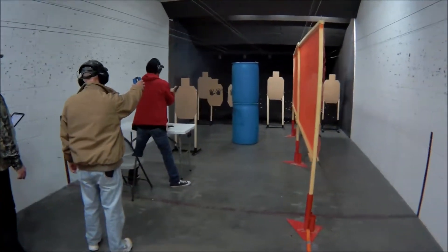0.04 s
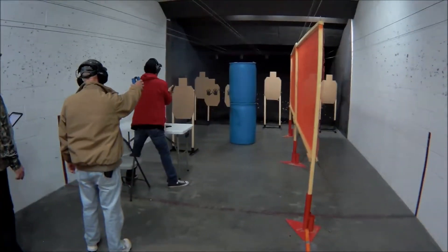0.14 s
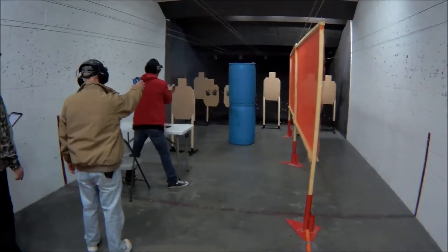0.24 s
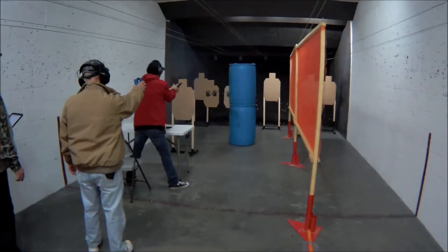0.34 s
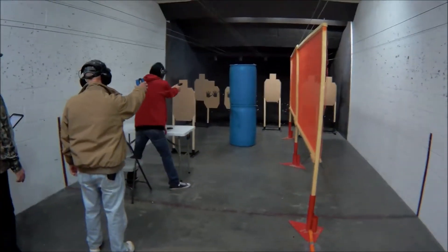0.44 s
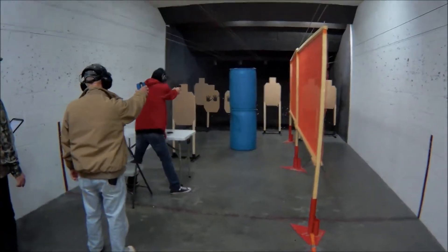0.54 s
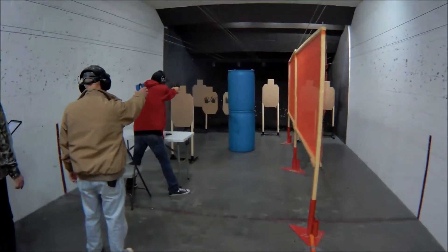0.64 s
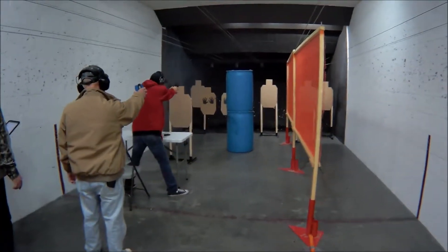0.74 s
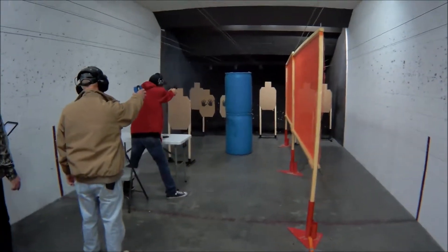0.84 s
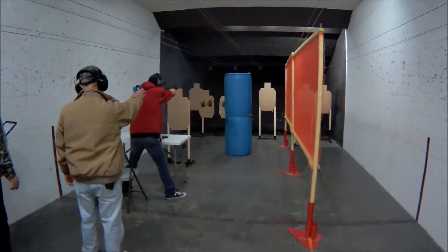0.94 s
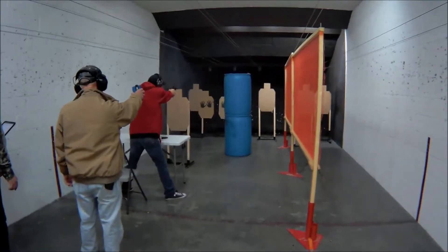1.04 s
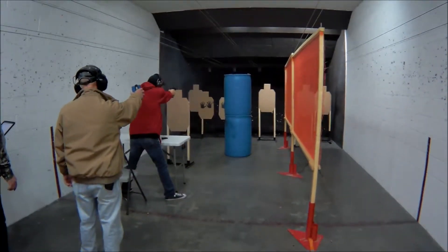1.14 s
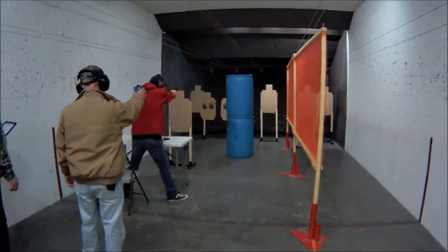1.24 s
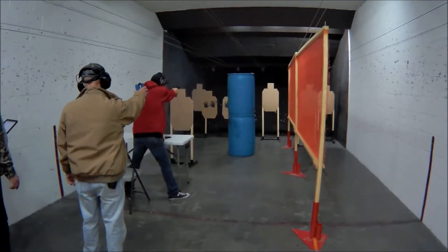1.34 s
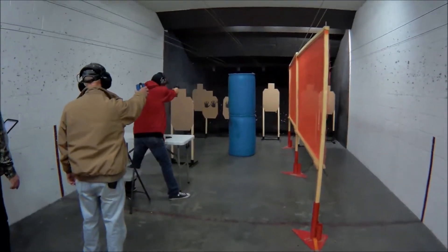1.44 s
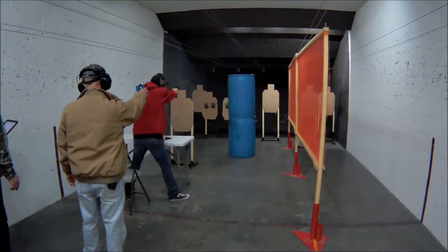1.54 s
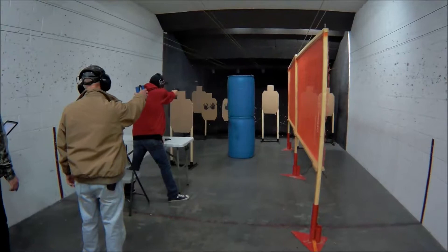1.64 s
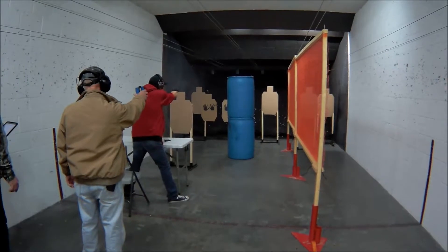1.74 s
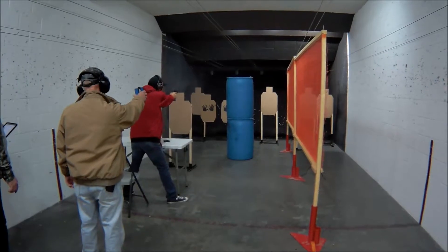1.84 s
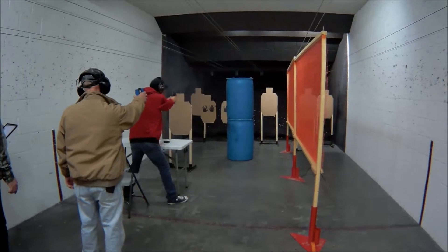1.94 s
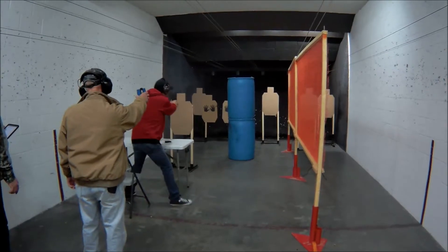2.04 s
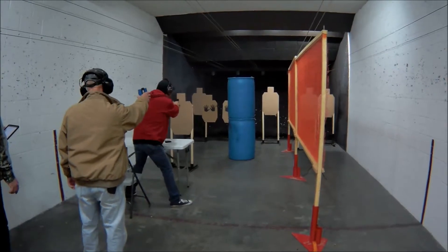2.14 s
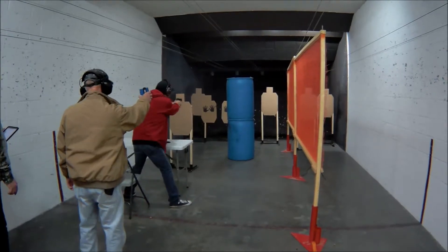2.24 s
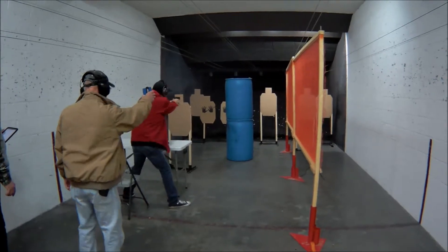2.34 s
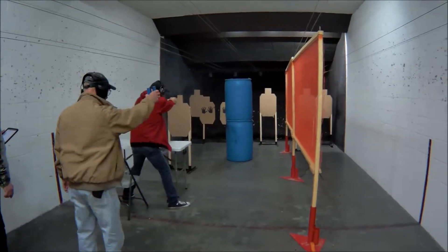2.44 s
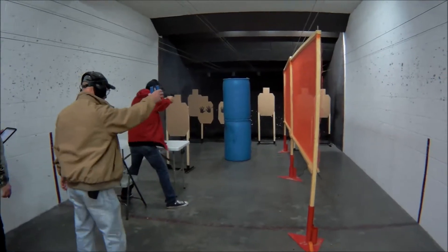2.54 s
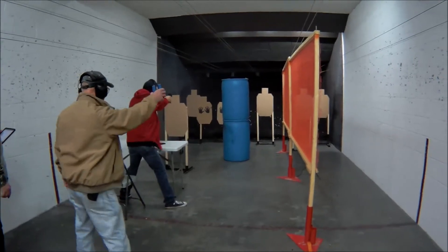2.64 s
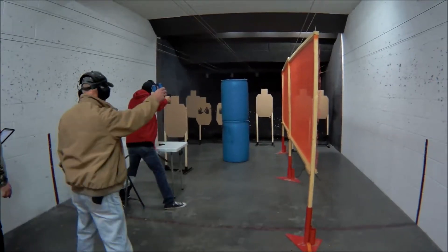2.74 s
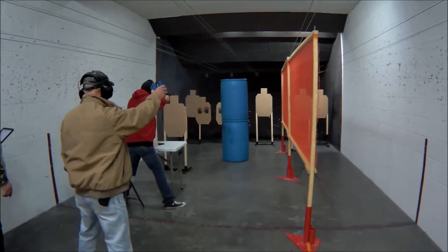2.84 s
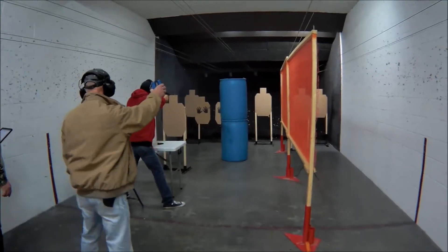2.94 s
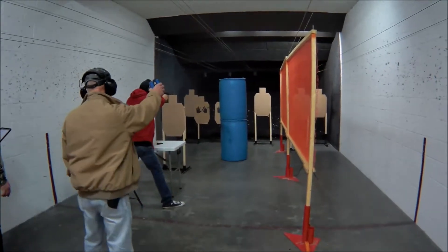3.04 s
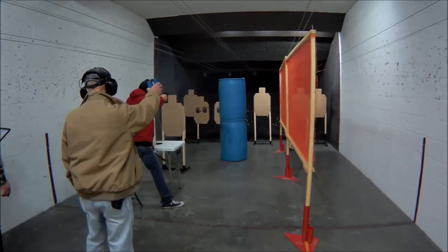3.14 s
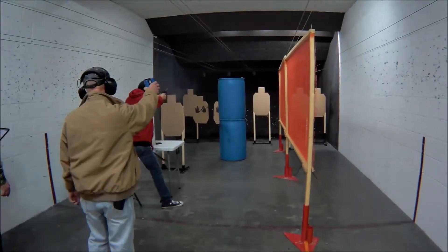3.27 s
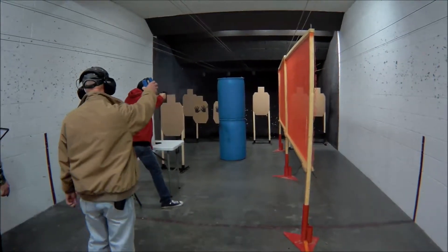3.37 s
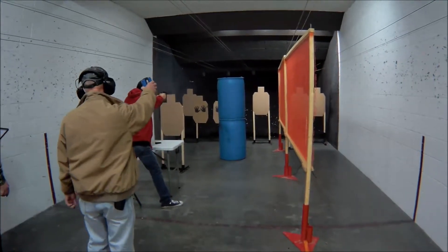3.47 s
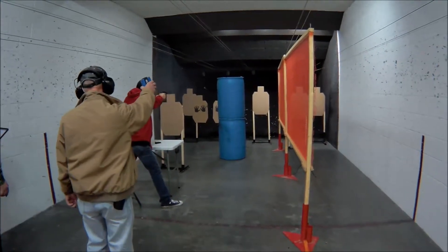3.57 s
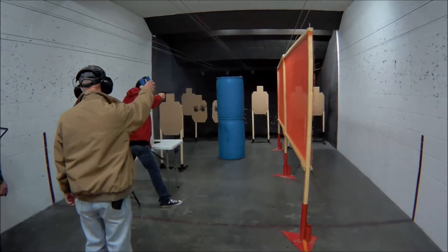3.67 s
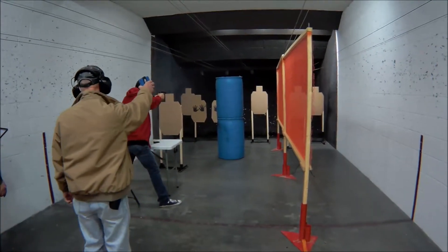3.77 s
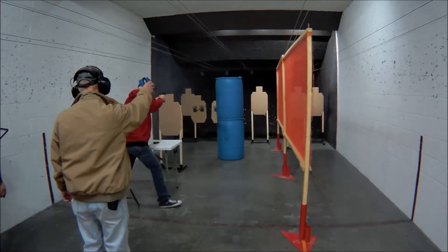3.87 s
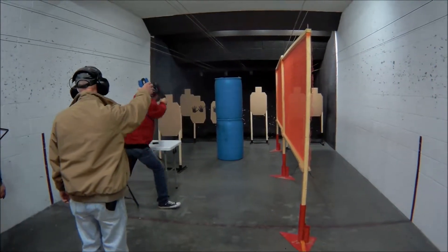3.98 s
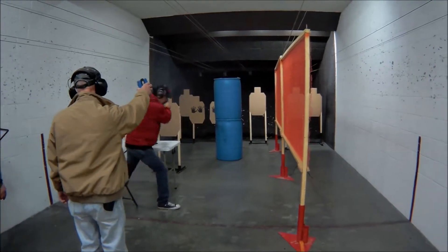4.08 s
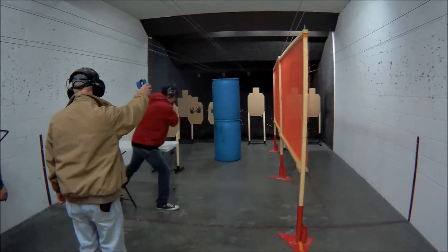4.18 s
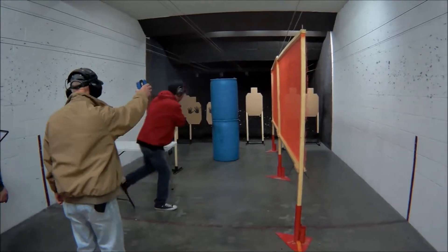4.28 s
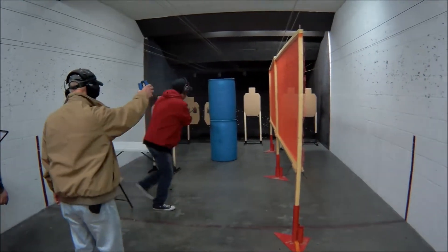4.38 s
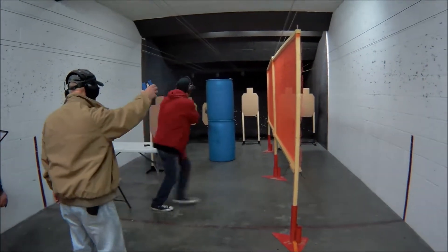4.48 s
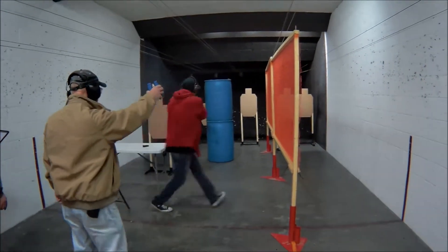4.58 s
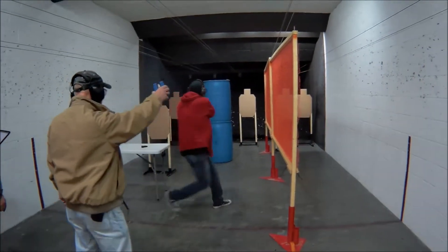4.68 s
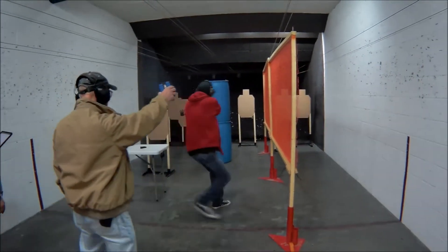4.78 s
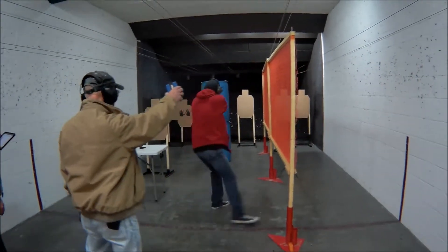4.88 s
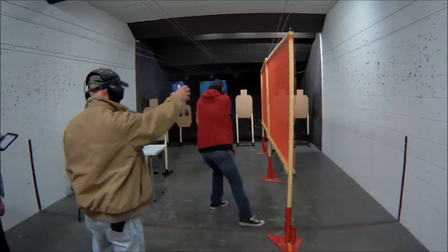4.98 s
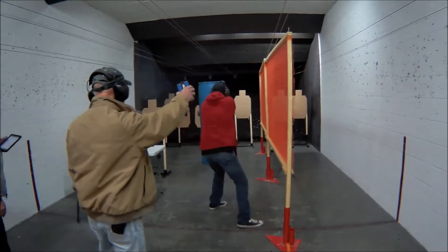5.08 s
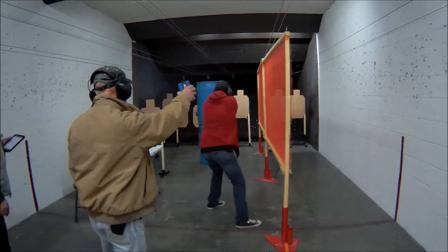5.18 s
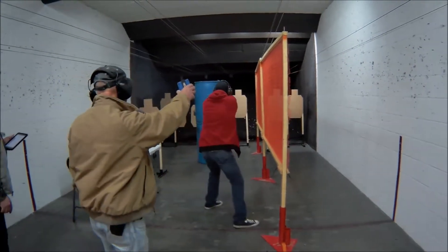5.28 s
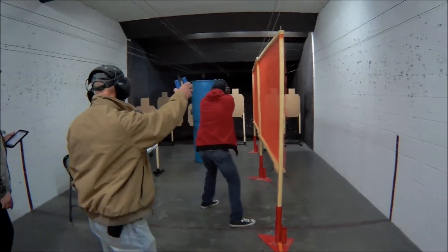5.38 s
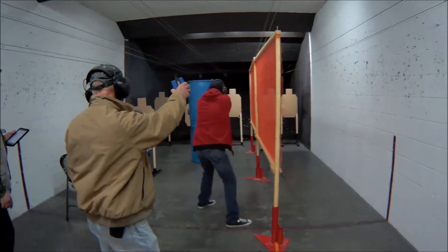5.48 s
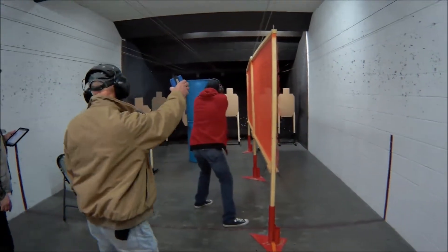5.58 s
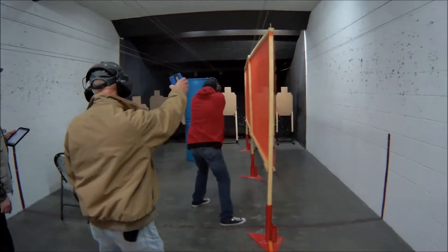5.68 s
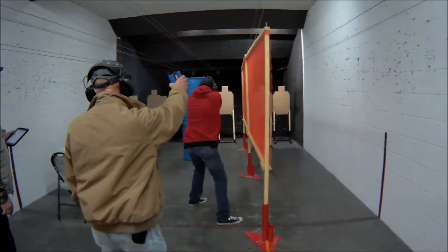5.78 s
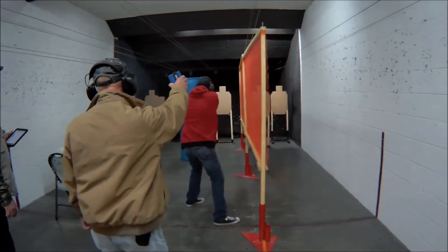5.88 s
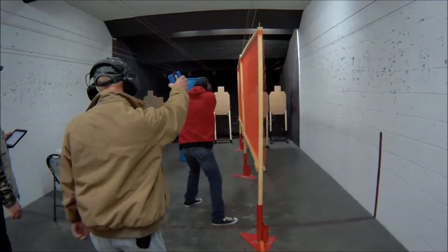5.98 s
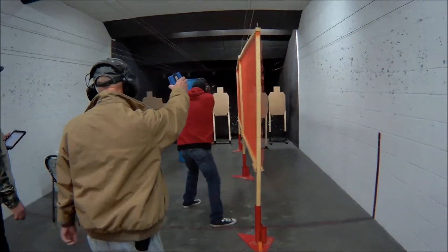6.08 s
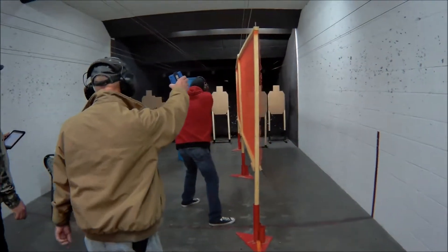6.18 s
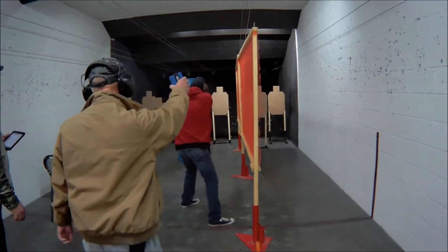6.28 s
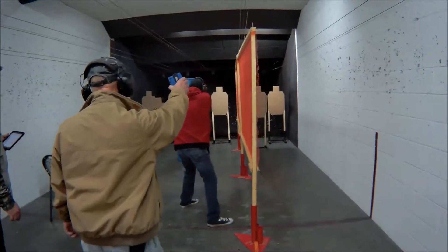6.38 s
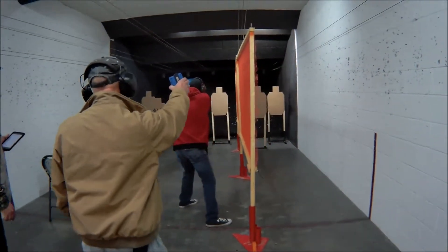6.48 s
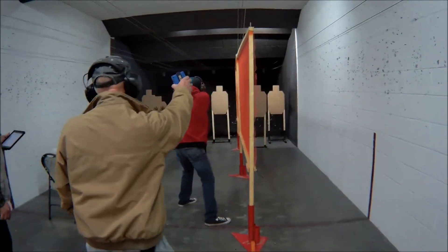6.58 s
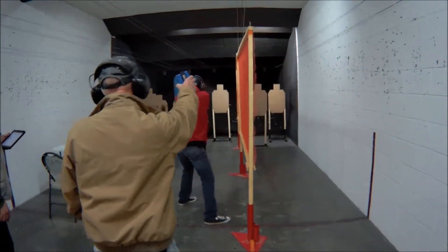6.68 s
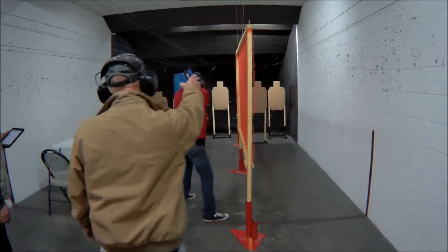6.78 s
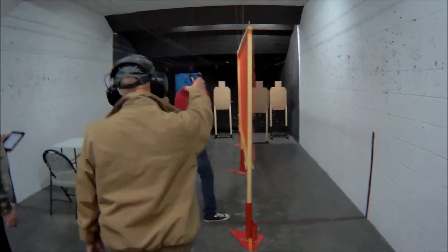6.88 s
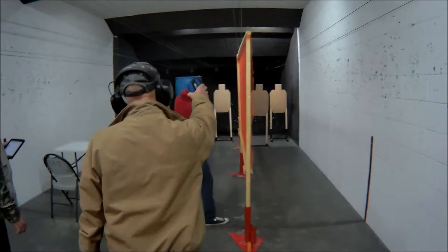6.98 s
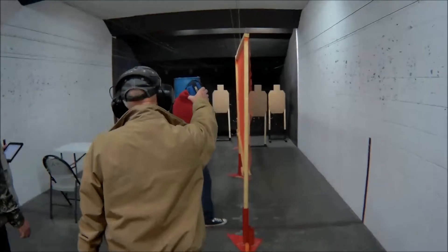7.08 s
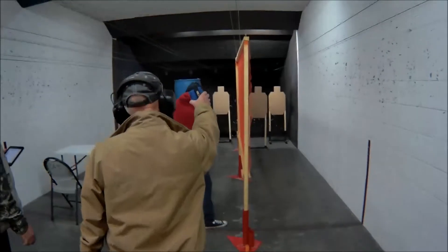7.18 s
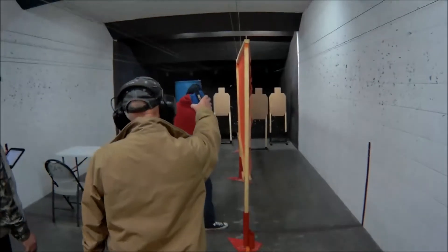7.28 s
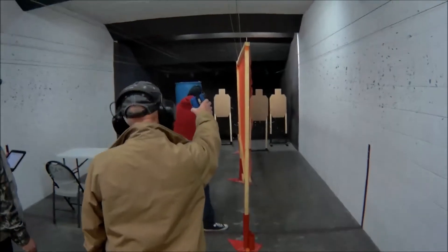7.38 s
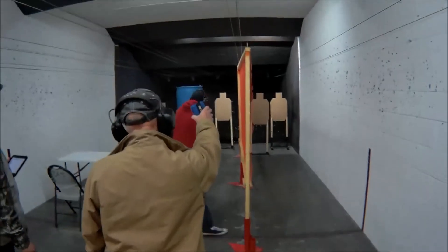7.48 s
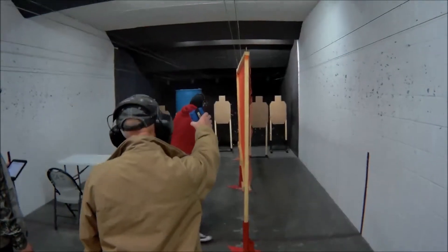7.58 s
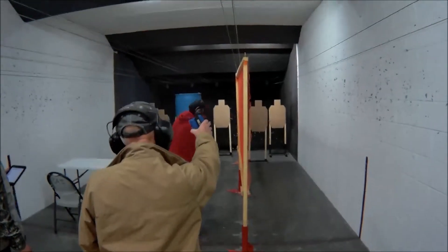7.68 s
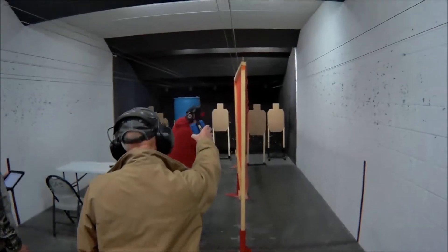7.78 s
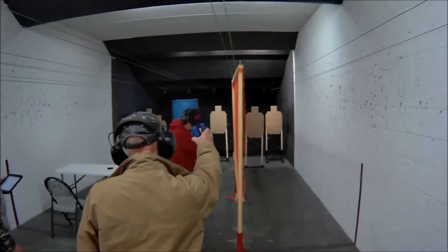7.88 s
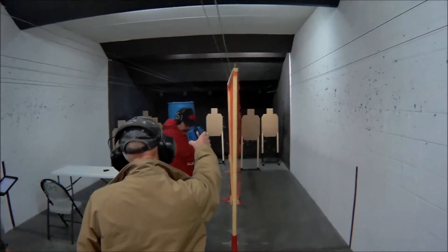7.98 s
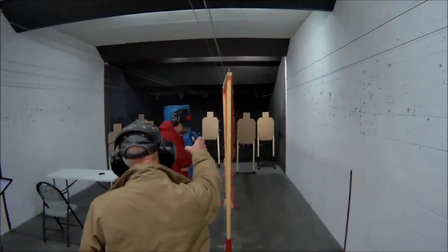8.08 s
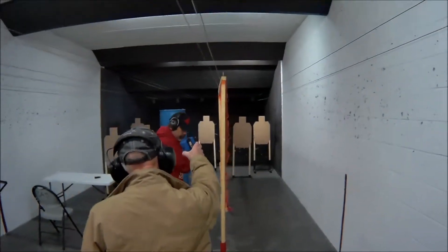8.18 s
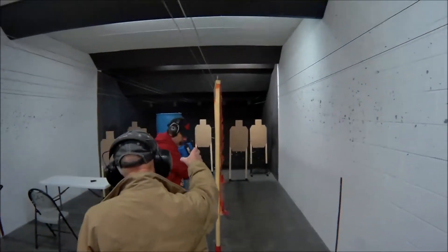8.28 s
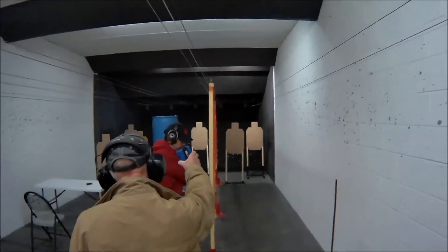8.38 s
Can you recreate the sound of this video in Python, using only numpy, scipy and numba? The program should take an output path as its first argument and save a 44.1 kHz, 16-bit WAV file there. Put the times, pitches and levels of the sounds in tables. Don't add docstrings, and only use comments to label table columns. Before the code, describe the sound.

A long concrete indoor range heard from a small camera a few metres from the shooter, over steady ventilation rumble and faint hiss. At 0.06 s a light touch with a tiny buckle ring, then at 0.32 s a gritty holster scrape with a crisp catch click. At 1.47 s a handgun blast cracks, overloads the microphone and swells into long ringing echoes with low standing waves; a casing clacks at 2.2 s. A second blast at 3.29 s is followed by thin brass rings, a clearer clack at 4.05 s, rustling cloth and shoe taps from 4.65 to 5.4 s, the sharpest a hard sole click at 4.93 s. Three faster shots come at 6.05, 6.69 and 7.2 s, growing louder and overlapping with their reverberation. Casings clack and ring at 7.6 and 8.07 s within the decaying tail, with soft handling rumble to the end, about 8.4 s.

```python
import sys
import numpy as np
from scipy import signal
from scipy.io import wavfile
from scipy.ndimage import uniform_filter1d
from numba import njit

SR = 44100
rng = np.random.default_rng(int(sys.argv[2]) if len(sys.argv) > 2 else 0)


def linear_from_db(decibels):
    return 10 ** (np.asarray(decibels, float) / 20)


def unload_audio(sound):
    columns = np.transpose(np.atleast_2d(sound))
    steps = np.round(np.clip(columns, -1, 1) * 32767)
    wavfile.write(sys.argv[1], SR, steps.astype(np.int16))


N = 371322

# t/s, blast level/dB, brightness above 2 kHz/(dB per octave), membrane thump level/dB, hall modes level/dB
SHOTS = [
    (1.473, 5, 1, -67, -2),
    (3.2895, 4.5, 0.94, -66, -2),
    (6.0535, 5, 0.96, -56.5, -4.5),
    (6.6933, 6, 1.1, -36, -3),
    (7.1968, 6.5, 1.05, -32.5, -6.5),
]
# f/Hz, width/Hz, level/dB
PORT_NOTCHES = [(12600, 500, -12), (13500, 1500, -4)]


def evened(x):
    return x / np.sqrt(np.mean(x ** 2) + 1e-20)


def read(points, hz):
    f, value = np.transpose(points)
    return np.interp(np.log(hz + 1), np.log(f + 1), value)


def peaks_db(table, hz):
    return sum(db / (1 + (2 * (hz - f) / width) ** 2) for f, width, db in table)


def swell(t, s, db, rise_db, fall_db, hold=0):
    climb_db = rise_db * np.maximum(s - t, 0)
    drop_db = fall_db * np.maximum(t - s - hold, 0)
    return linear_from_db(db - climb_db - drop_db)


def add(mix, s, sound):
    part = mix[round(s * SR):][:len(sound)]
    part += sound[:len(part)]


def shaped(count, gain, size=512):
    overlap = size * 3 // 4
    hz, t, z = signal.stft(rng.standard_normal(count), SR, nperseg=size, noverlap=overlap)
    z = z * gain(hz[:, None], t[None])
    return signal.istft(z, SR, nperseg=size, noverlap=overlap)[1][:count]


def hall_decay(hz, t, early_db, early_t60):
    # f/Hz, t60/s
    late_t60 = [(100, 1.2), (250, 0.98), (500, 1.003), (1000, 0.98), (2000, 0.99), (4000, 0.69),
                (6000, 0.56), (8000, 0.48), (11000, 0.36), (14000, 0.36)]
    late = linear_from_db(-60 * t / read(late_t60, hz))
    early = linear_from_db(early_db - 60 * t / early_t60)
    return np.sqrt(late ** 2 + early ** 2)


def floor():
    # f/Hz, level/dB
    background = [(29, -31.5), (50, -2), (539, -11), (579, -6.5), (623, -19), (702, -11.5), (755, -14.5),
                  (5410, -32), (11700, -34), (15600, -31)]
    lumps = evened(uniform_filter1d(rng.standard_normal(N // 256 + 9), size=6))

    def gain(hz, s):
        lump_db = 2.5 * lumps[:s.size] / (1 + hz / 300)
        return linear_from_db(read(background, hz) + lump_db)

    return linear_from_db(-64) * evened(shaped(N, gain, size=1024))


def movement():
    # t/s, level/dB
    hand_shifts = [
        (.37, -56.5),
        (1.621, -55),
        (2.58, -69.5),
        (3.33, -65.5),
        (6.05, -64.5),
        (7.5, -59),
        (8.15, -55),
    ]
    # loudest t/s, level/dB, rise/(dB per s), fall/(dB per s)
    walker = (3.5, -69.5, 55, 8)
    grip_db, shake_db = -73.5, -6.5
    t = np.arange(N) / SR
    rumble = evened(shaped(N, lambda hz, s: 1 / (1 + (hz / 42) ** 4) * (hz > 15), size=4096))
    rustle = shaped(N, lambda hz, s: hz / (hz + 600) / (1 + hz / 3000) / (1 + (hz / 8000) ** 2))
    clumps = evened(uniform_filter1d(rng.standard_normal(N), size=900))
    rustle = evened(rustle * linear_from_db(1.8 * clumps))
    shifts = sum(swell(t, s, db, rise_db=45.5, fall_db=14) ** 2 for s, db in hand_shifts)
    shakes = sum(swell(t, s, thump_db + shake_db, rise_db=2000, fall_db=49) ** 2
                 for s, _, _, thump_db, _ in SHOTS)
    handling = rumble * np.sqrt(linear_from_db(grip_db) ** 2 + shifts + shakes)
    return handling + rustle * swell(t, *walker)


def scrape():
    # peak t/s, level/dB, attack/s, hold/s, release/(dB per s)
    stroke_table = [
        (0.059, -44, 0.013, .005, 95),
        (0.324, -25.5, .022, 0.076, 142),
        (0.445, -50.5, .05, 0.043, 62),
    ]
    # f/Hz, level/dB
    friction = [(150, -27.5), (400, -12.5), (1200, -18.5), (1350, -7), (2600, -6.5), (3300, 2), (4200, -3),
                (5000, -4), (8000, -10), (11700, -9.5), (12300, -24), (13500, -28), (15500, -17)]
    # f/Hz, width/Hz, level/dB
    shell = [(2130, 150, 3), (3850, 300, 5), (5920, 250, 5), (8760, 260, 8)]
    climb_db = 25
    t = np.arange(SR) / SR

    def gain(hz, s):
        dulling_db = -40 * np.maximum(s - .44, 0) * np.log2((hz + 300) / 3000)
        return linear_from_db(read(friction, hz) + peaks_db(shell + PORT_NOTCHES, hz) + dulling_db)

    grit = shaped(SR, gain)
    grit *= linear_from_db(1.5 * evened(uniform_filter1d(rng.standard_normal(SR), size=60)))
    strokes = sum(swell(t, s, db, climb_db / attack, release_db, hold)
                  for s, db, attack, hold, release_db in stroke_table)
    return evened(grit) * strokes


def snap(db, hz, t60):
    t = np.arange(SR // 4) / SR
    wobble = uniform_filter1d(rng.standard_normal((2, len(t))), size=130, axis=1)
    ring = wobble[0] * np.sin(2 * np.pi * hz * t) + wobble[1] * np.cos(2 * np.pi * hz * t)
    return linear_from_db(db - 60 * t / t60) * evened(ring)


def step(db, hz, t60):
    t = np.arange(4000) / SR
    puff = signal.lfilter(*signal.butter(2, 900, fs=SR), rng.standard_normal(len(t)))
    tap = np.sin(2 * np.pi * hz * t) + 0.79 * evened(puff)
    onset = 1 - np.exp(-t / 0.0028)
    return linear_from_db(db - 60 * t / t60) * tap * onset


def casing(clack_db, ring_db, t60):
    # f/Hz, level/dB
    clack_tone = [(2470, -26), (4200, -8), (4580, -14.5), (5770, 1.5), (6400, -16.5), (7210, -6.5),
                  (7960, -18.5), (11500, -10.5), (12300, -38), (15500, -20)]
    brass_hz, brass_width_hz = 11430, 180
    t = np.arange(SR // 2) / SR
    clack = shaped(len(t), lambda hz, s: linear_from_db(read(clack_tone, hz)) * hall_decay(hz, s * 1.1, 4.9, 0.034), size=256)
    ring = shaped(len(t), lambda hz, s: 1 / (1 + (2 * (hz - brass_hz) / brass_width_hz) ** 4))
    onset = 1 - np.exp(-t / 0.0019)
    ring = evened(ring) * linear_from_db(-60 * t / t60) * onset * np.cos(np.pi * t)
    return linear_from_db(clack_db) * clack / np.std(clack[:1300]) + linear_from_db(ring_db) * ring


def shot(db, bright_db, thump_db, rise, modes_db):
    # f/Hz, level/dB
    blast = [(24, -59), (40, -29), (91, -13), (387, -8), (741, -8), (1220, -5), (1780, -10), (2460, -8),
             (2710, -10.5), (3850, -16), (4580, -17.5), (5740, -15), (8550, -26.5), (10400, -21),
             (15600, -37)]
    # f/Hz, width/Hz, level/dB
    shot_peaks = [(1366, 450, 5), (3850, 330, 9.5), (5780, 100, 5.5), (2664, 430, -6.5), (1940, 99, 2.5),
                  (2530, 160, 5), (3120, 190, 5), (4240, 270, 6), (4835, 150, 4), (5237, 81, 2)]
    # f/Hz, level/dB, t60/s
    hall_modes = [(104.5, -25.5, 1.2), (111.3, -22.5, 1.3), (152.8, -19, 1.3), (189.6, -35, 1.3),
                  (214, -35, 0.74), (251, -28, 1.4), (310, -29, 1.2), (371, -26.5, 1.2), (387, -27.5, 0.62),
                  (475.4, -31.5, 1.3), (494, -30, 1.5), (564, -29.5, 1.1)]
    t = np.arange(2 * SR) / SR
    lumps = rng.standard_normal((513, 360))
    lumps = uniform_filter1d(lumps, size=14, axis=0)
    lumps = evened(uniform_filter1d(lumps, size=4, axis=1))

    def gain(hz, s):
        tilt_db = bright_db * np.log2(np.maximum(hz, 2000) / 2000)
        build = 1 - np.exp(-(s + 0.0017) * (hz + 30) / 5.0)
        colour = linear_from_db(read(blast, hz) + peaks_db(shot_peaks + PORT_NOTCHES, hz) + tilt_db)
        colour = colour / (1 + (170 / (hz + 1)) ** 3)
        decay = hall_decay(hz, s, early_db=-1.5, early_t60=0.44)
        return colour * build * decay * linear_from_db(1.6 * lumps[:, :s.size])

    echoes = shaped(len(t), gain, size=1024)
    echoes /= np.std(echoes[:4000])
    echoes *= linear_from_db(5.4 * np.exp(-((t - .37) / 0.12) ** 2))
    echoes *= 1 - .8 * np.exp(-t / rise)
    modes = sum((-1) ** k * linear_from_db(level_db - 60 * t / t60) * np.sin(2 * np.pi * f * t)
                for k, (f, level_db, t60) in enumerate(hall_modes))
    modes *= 1 - np.exp(-t / 0.048)
    thump = linear_from_db(thump_db) * linear_from_db(21.5) * t / .0032 * np.exp(-t / 0.0036) * (1 - t / .0128)
    return linear_from_db(db) * (echoes + linear_from_db(modes_db) * modes + thump)


def scene():
    # t/s, clack level/dB, brass ring level/dB, ring t60/s
    casing_hits = [(2.206, -48.5, -70, 0.2), (2.841, -68, -60.5, 0.39), (3.62, -80, -58.5, 0.96),
                   (3.83, -75, -61, 2), (4.050, -48.5, -58, 0.42), (4.602, -69.5, -90, 0.38),
                   (4.640, -85.5, -53.5, 0.27), (5.04, -85, -80, 0.45), (5.18, -79.5, -70.5, 0.36),
                   (5.34, -85.5, -71, .5), (5.46, -90, -75, 0.38), (5.80, -85, -75, 0.25),
                   (5.89, -93.5, -74.5, .4), (7.57, -80, -51, 0.82), (7.63, -46.5, -65, 0.5),
                   (8.065, -59.5, -48, 0.37), (8.145, -79.5, -66, 0.27), (8.29, -69, -72.5, .3)]
    # t/s, level/dB, f/Hz, t60/s
    taps = [
        (4.65, -57, 120, 0.17),
        (4.816, -52, 109, .08),
        (4.87, -53, 300, 0.036),
        (4.931, -39.5, 1373, 0.025),
        (4.932, -52, 500, 0.033),
        (5.07, -57, 201.3, 0.031),
        (5.305, -63, 250, .06),
        (5.39, -71, 200, .05),
    ]
    # t/s, level/dB, f/Hz, t60/s
    snaps = [
        (.055, -61, 5800, .4),
        (.055, -66, 3820, .4),
        (.055, -66, 2240, 0.59),
        (.3235, -40, 3550, 0.0082),
        (.325, -45, 8780, 0.27),
        (4.932, -66, 3800, .02),
    ]
    ringing_s = 1
    quiet_rise_s, ringing_rise_s = 0.015, .0009
    mix = floor() + movement()
    add(mix, 0, scrape())
    last = -ringing_s
    for s, db, bright_db, thump_db, modes_db in SHOTS:
        rise = ringing_rise_s if s - last < ringing_s else quiet_rise_s
        add(mix, s, shot(db, bright_db, thump_db, rise, modes_db))
        last = s
    for table, source in ((casing_hits, casing), (taps, step), (snaps, snap)):
        for s, *row in table:
            add(mix, s, source(*row))
    return mix[None]


@njit
def follow(over_db, attack, release):
    out, state = np.zeros(len(over_db)), 0.
    for i in range(len(over_db)):
        state += (over_db[i] - state) * (attack if over_db[i] > state else release)
        out[i] = state
    return out


def holed(x):
    thinned = [.075, .163, .695, 2.08, 2.51, 2.835, 2.847, 3.15, 4.41, 4.71, 4.75, 5.435, 5.475, 5.605,
               6.14, 6.46, 6.55, 6.562, 6.89, 7.12, 8.39, 8.402]
    # level/dB, f/Hz
    quiet_limit = (-60, 2200)
    loud_limit = (-25, 5300)
    empty_top_db, empty_depth_db = -37, 14
    survive = 1.7
    hz, t, z = signal.stft(x, SR, nperseg=1024, noverlap=512)
    power = (abs(z[:512]) ** 2).reshape(64, 8, -1).mean(1)
    bands_db = 10 * np.log10(power + 1e-14)
    top_db = bands_db[2:].max(0)
    under_db = uniform_filter1d(bands_db - top_db, size=3, axis=1)
    chance = evened(uniform_filter1d(rng.standard_normal(bands_db.shape), size=7, axis=1))
    chance[35:40] -= 1.5
    empty = (under_db < empty_top_db) & (under_db > empty_top_db - empty_depth_db) & (chance < -.5)
    empty[:13] = False
    empty[:, np.gradient(top_db) > 5] = False
    empty[:33, top_db < bands_db.max() - 24] = False
    for s in thinned:
        pair = round(s * SR / 512) + np.arange(2)
        level_db = 20 * np.log10(np.std(x[round(s * SR):][:800]))
        limit_hz = np.interp(level_db, *np.transpose([quiet_limit, loud_limit]))
        size = abs(z[:, pair])
        weak = size < survive * uniform_filter1d(size, size=25, axis=0)
        lost = weak & (hz > limit_hz)[:, None]
        z[:, pair] *= 1 - np.array([.95, .65]) * lost
    z[:512] *= 1 - .97 * empty.repeat(8, axis=0)
    return signal.istft(z, SR, nperseg=1024, noverlap=512)[1][:N]


def attack_shaped(x):
    hard_clacks = [4.584, 4.608]
    lead_s, dull_s, attack_edge_hz = .006, .035, 8800
    lead_noise_db = -24
    hz, t, z = signal.stft(x, SR, nperseg=256, noverlap=192)
    for s in [row[0] for row in SHOTS] + hard_clacks:
        block = (t > s - lead_s) & (t < s + dull_s - lead_s)
        lead_noise = rng.standard_normal((2, *z[:, block].shape))
        mean = abs(z[:, block]).mean(1, keepdims=True)
        z[:, block] += linear_from_db(lead_noise_db) * mean * (lead_noise[0] + 1j * lead_noise[1])
        z[np.ix_(hz > attack_edge_hz, block)] *= .015
    z *= (hz < 15350)[:, None]
    z *= 1 + 0.15 * rng.standard_normal(z.shape)
    return signal.istft(z, SR, nperseg=256, noverlap=192)[1][:N]


def low_pass(x):
    return signal.sosfilt(signal.butter(12, 15710, fs=SR, output="sos"), x)


def record(dry):
    hiss_db, haze_db = -88, -51.5
    power_db = 10 * np.log10(signal.lfilter([.004], [1, -.996], dry[0] ** 2) + 1e-12)
    limit_db = follow(0.34 * np.maximum(power_db + 21.5, 0), 1 / (0.00049 * SR), 1 / (0.0093 * SR))
    slow_db = follow(0.32 * np.maximum(power_db - limit_db + 27, 0), 1 / (.07 * SR), 1 / (.06 * SR))
    loud = 1.3 * np.tanh(dry[0] / linear_from_db(limit_db + slow_db) / 1.3)
    level = signal.lfilter([1 / 900], [1, 1 / 900 - 1], loud ** 2) ** .19
    hiss = signal.lfilter(*signal.butter(2, [4000, 15500], "band", fs=SR), rng.standard_normal(N))
    loud = loud + hiss * (linear_from_db(hiss_db) + linear_from_db(haze_db) * level)
    out = np.clip(attack_shaped(holed(loud)), -1, 1)
    return low_pass(out[None])


dry = scene()
out = record(dry)
unload_audio(out)
```